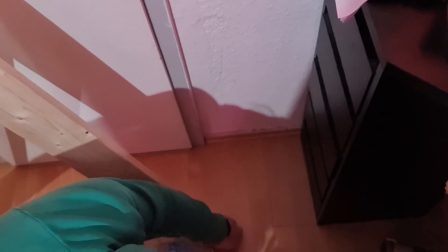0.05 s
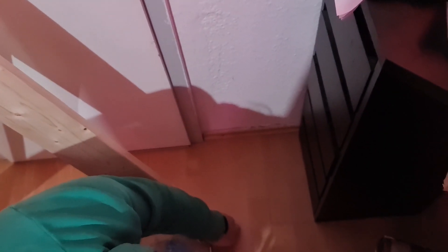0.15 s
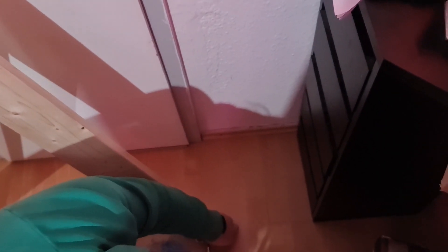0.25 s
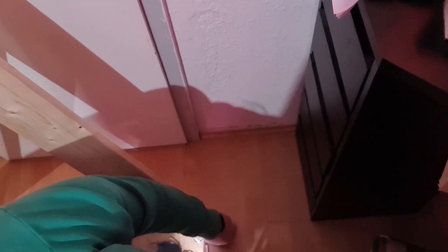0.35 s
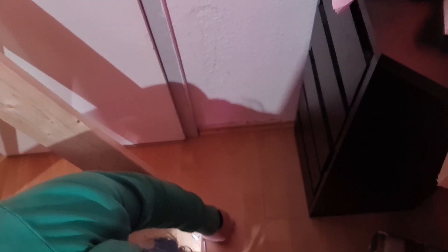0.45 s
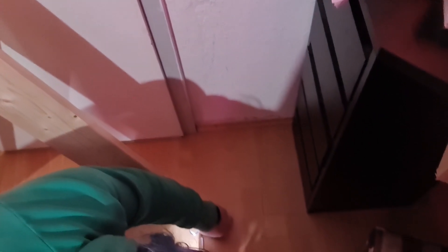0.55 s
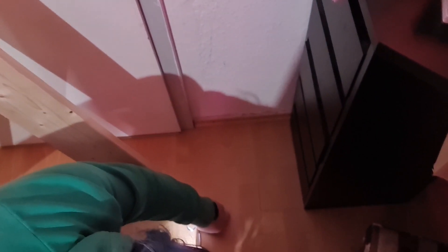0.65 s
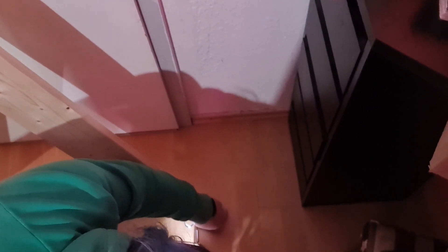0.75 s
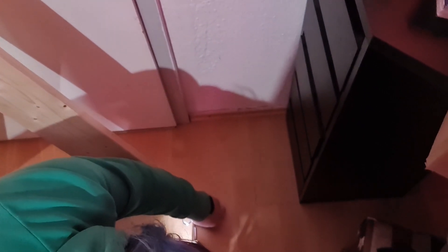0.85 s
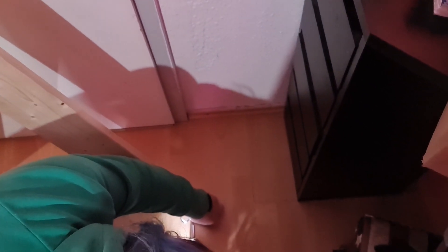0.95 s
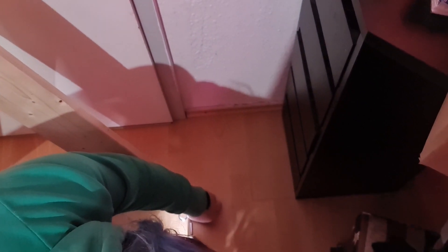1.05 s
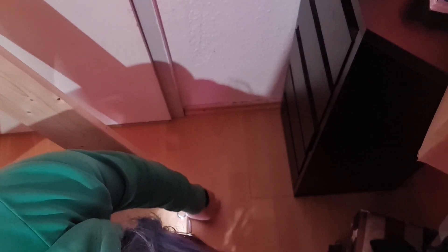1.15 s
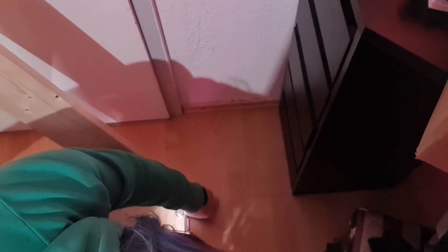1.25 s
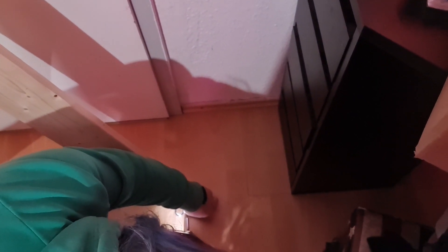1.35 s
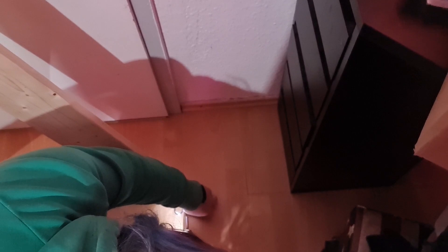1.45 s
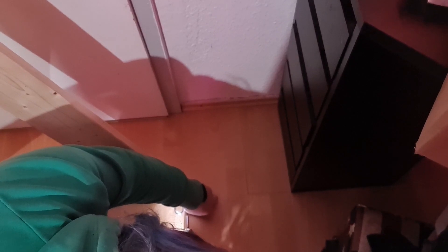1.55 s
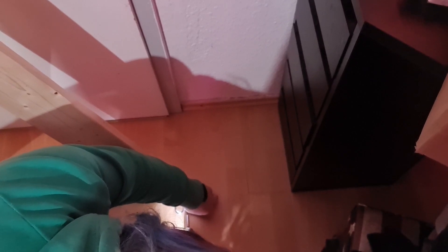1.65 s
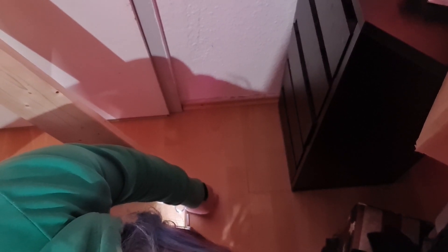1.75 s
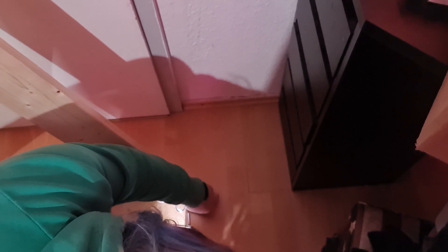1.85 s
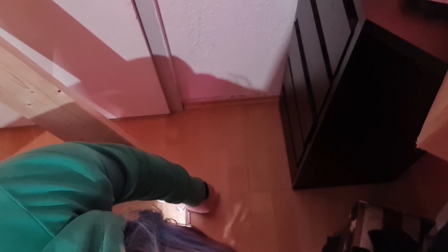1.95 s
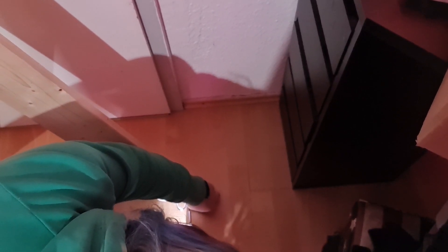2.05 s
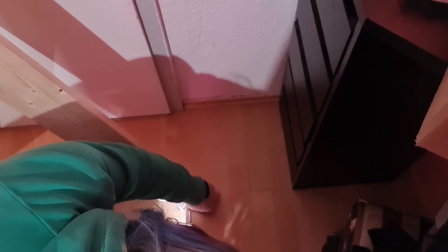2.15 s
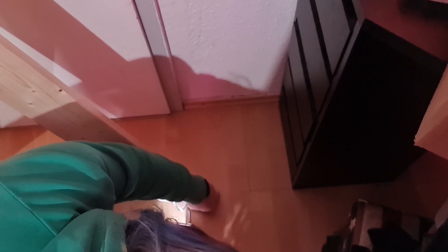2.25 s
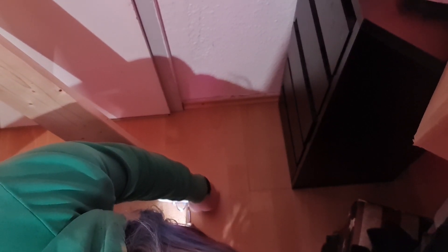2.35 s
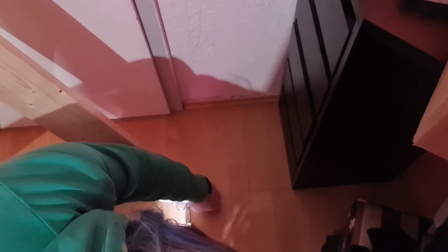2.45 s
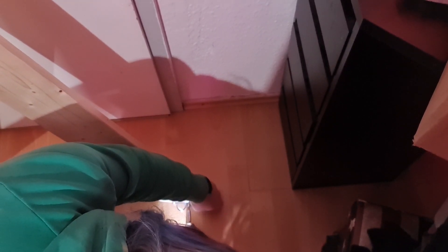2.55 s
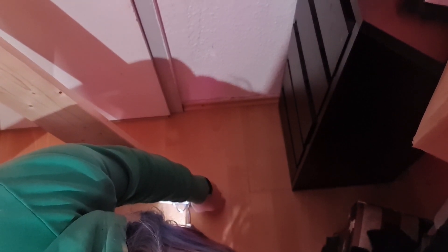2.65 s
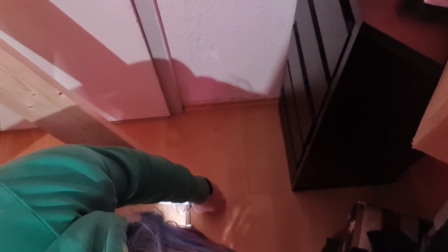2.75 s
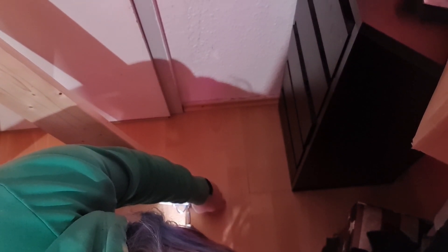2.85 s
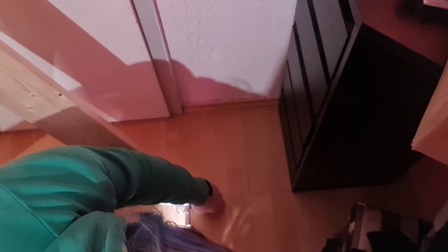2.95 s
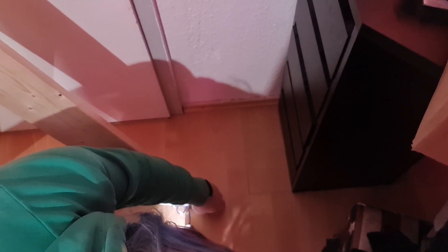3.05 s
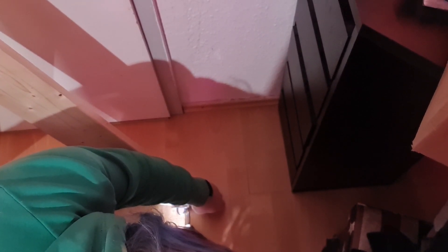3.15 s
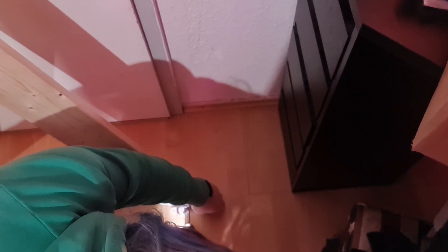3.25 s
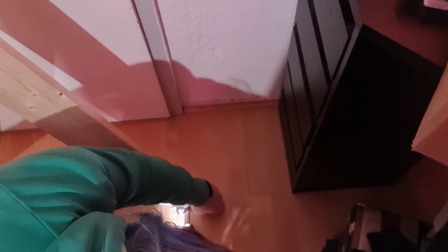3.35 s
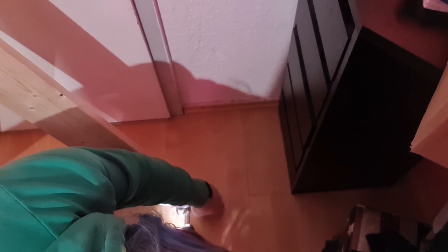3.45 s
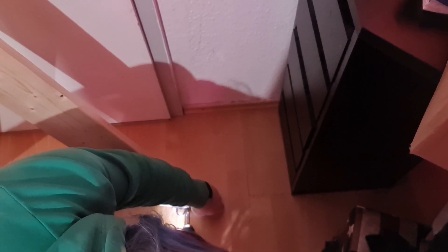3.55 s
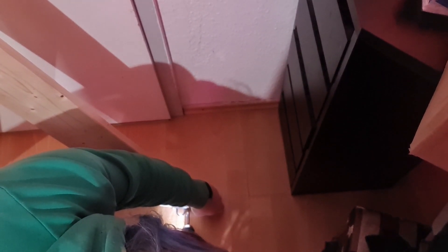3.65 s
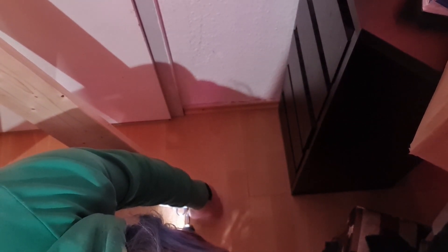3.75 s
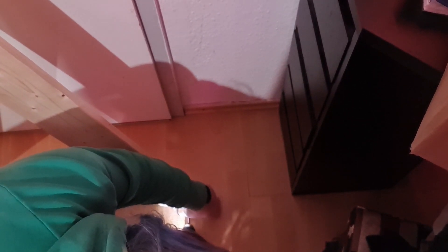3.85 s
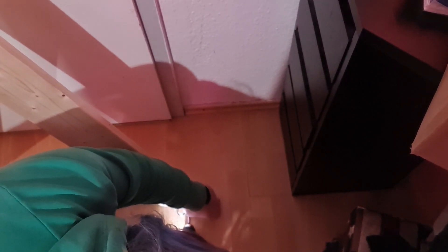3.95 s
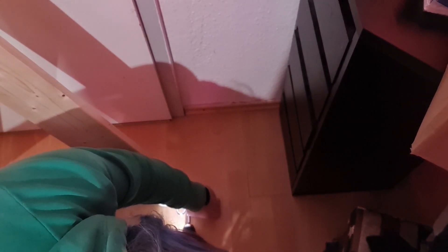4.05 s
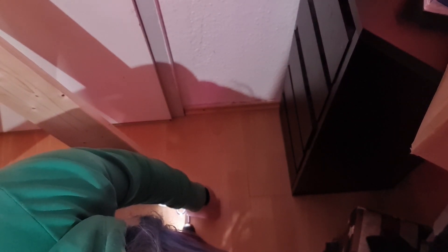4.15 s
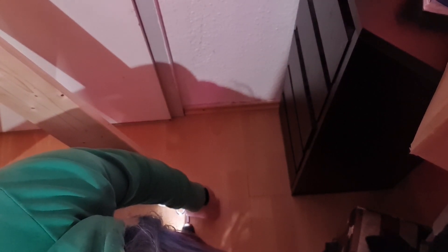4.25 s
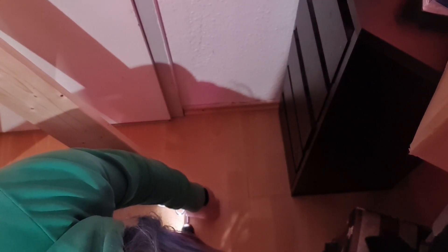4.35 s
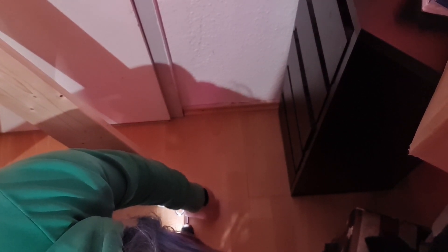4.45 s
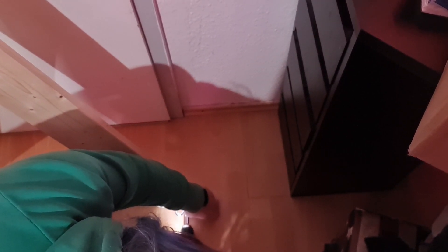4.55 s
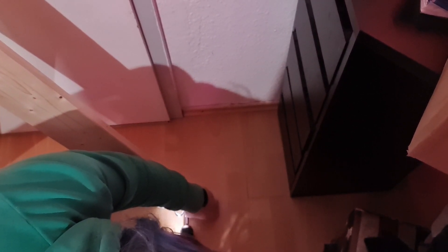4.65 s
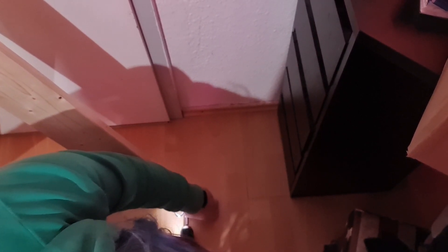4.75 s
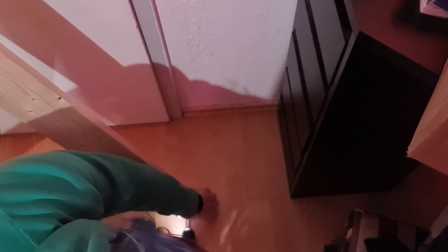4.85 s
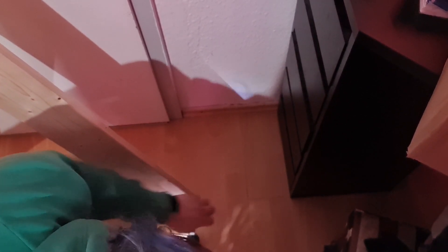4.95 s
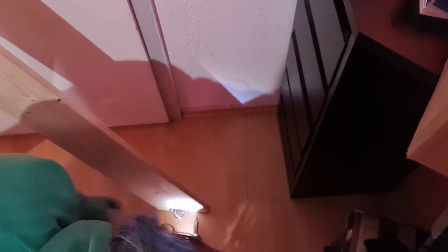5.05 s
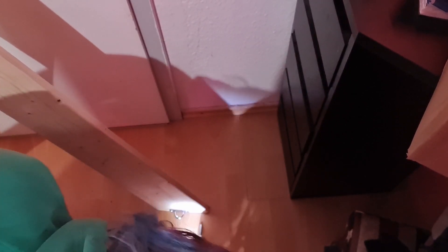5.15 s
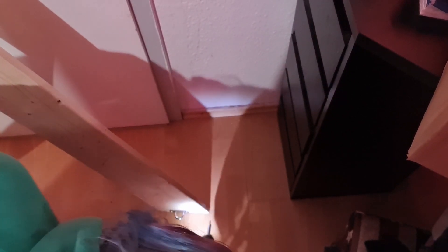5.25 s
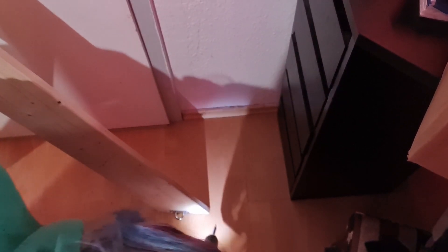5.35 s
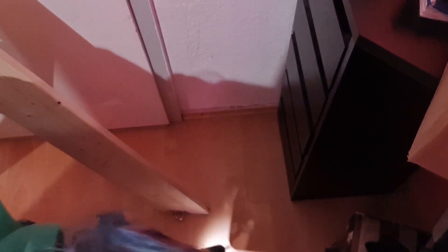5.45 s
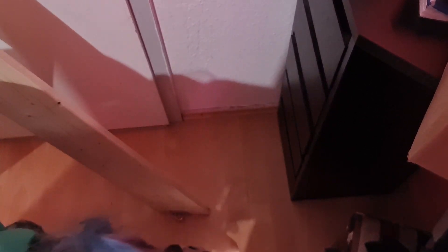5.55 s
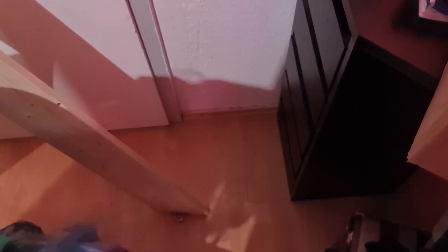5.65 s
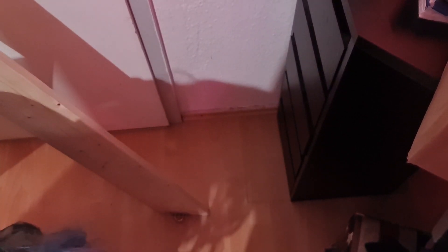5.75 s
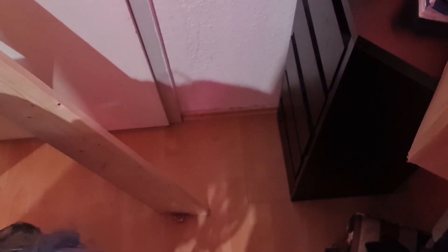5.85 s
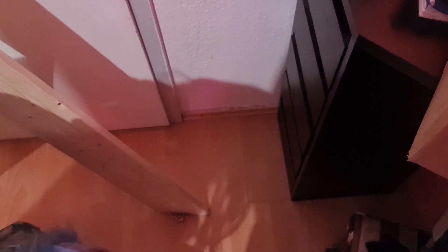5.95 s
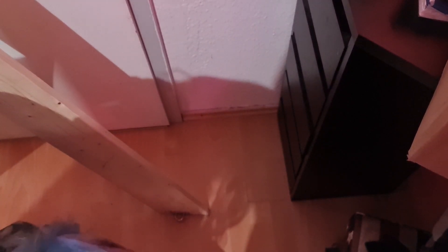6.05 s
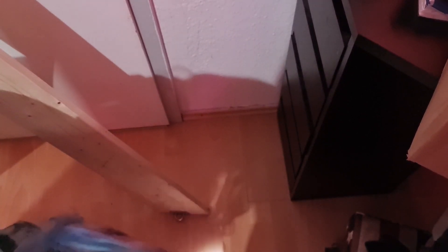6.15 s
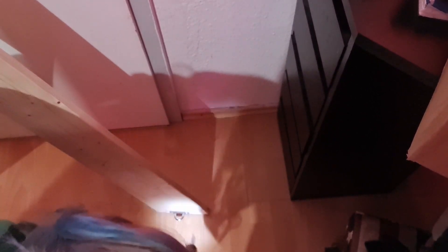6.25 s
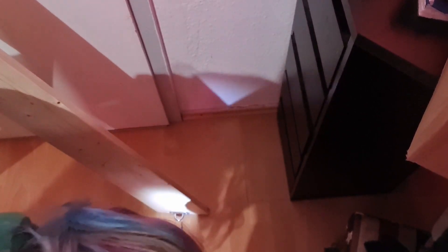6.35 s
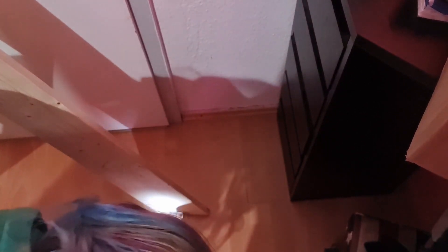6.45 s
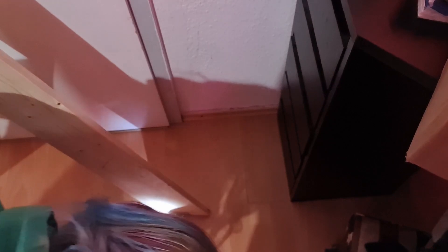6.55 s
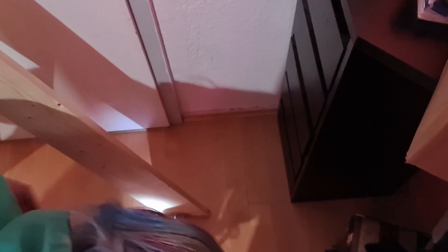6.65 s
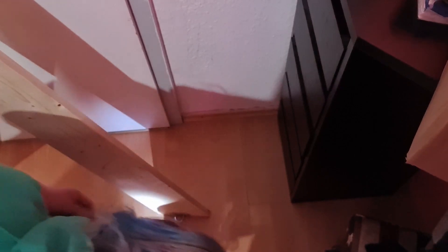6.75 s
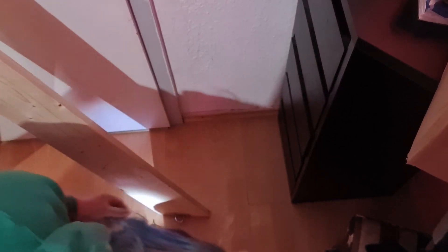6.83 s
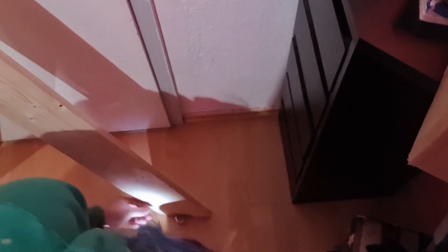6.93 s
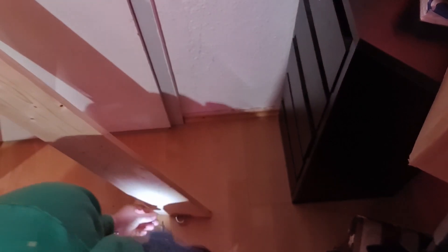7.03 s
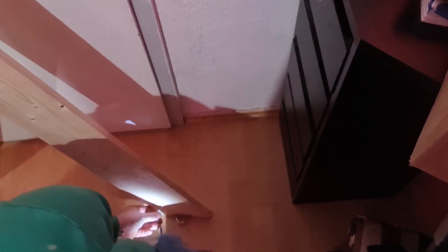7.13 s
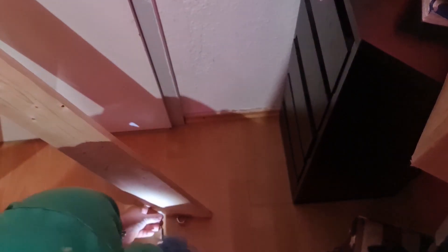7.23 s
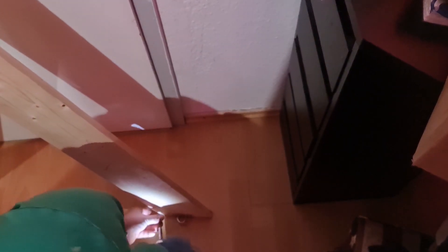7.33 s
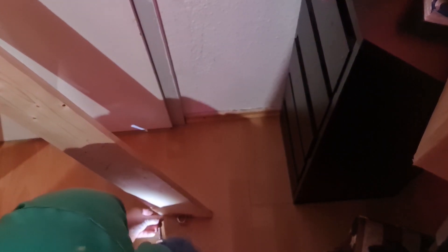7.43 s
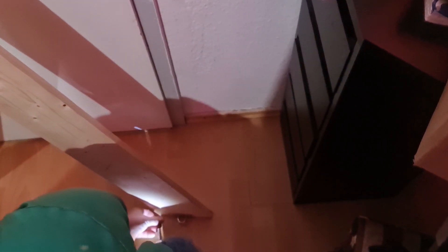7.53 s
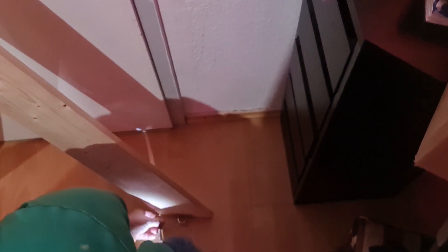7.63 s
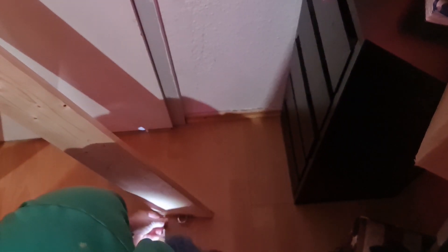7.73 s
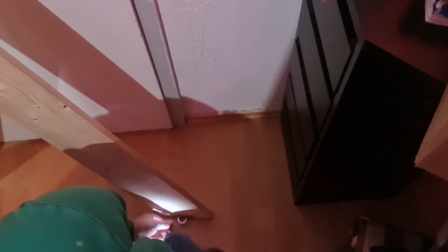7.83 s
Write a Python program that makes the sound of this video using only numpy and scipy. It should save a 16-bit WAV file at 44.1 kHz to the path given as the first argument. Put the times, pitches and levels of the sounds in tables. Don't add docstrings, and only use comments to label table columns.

```python
import sys
import numpy as np
from scipy import signal
from scipy.fft import rfft, irfft, next_fast_len
from scipy.io import wavfile
from scipy.ndimage import uniform_filter1d, map_coordinates

SR = 44100
rng = np.random.default_rng(int(sys.argv[2]) if len(sys.argv) > 2 else 0)


def amplitude_ratio(level_db):
    exponent = np.asarray(level_db, float) / 20
    return 10 ** exponent


def log_audio(samples):
    frames = np.atleast_2d(samples).T
    limited = np.clip(frames, -1, 1)
    pcm = np.round(limited * 32767).astype(np.int16)
    wavfile.write(sys.argv[1], SR, pcm)


N = 347949
TIME = np.arange(N) / SR

# (t/s,)
RUN_SPAN = [(.314,), (4.288,)]
# (t/s, extra rattle level/dB, extra gear whine level/dB, extra commutator level/dB)
BIT_LOAD = [(.33, -5, -23, -23), (.41, 1.5, 1.5, 1.5), (.62, 1.5, 1, 1), (.76, 2, 3, 2), (1.1, 0, 1, 1),
            (1.25, 0, -4, -2), (1.4, -.5, .5, 1), (1.62, -1, -5, -7), (1.72, 0, -4, 2), (1.82, 1, 2.5, -1),
            (2.1, 2, -7, -1), (2.25, 1, -5, -1), (2.4, .5, 1, -1), (2.55, 1, -3, -2), (2.75, 1.5, -4, -5),
            (2.9, 1.5, 1, -6), (3.15, 1, .5, -6), (3.42, 3, -2, -6), (3.55, 3.5, 5, -3), (3.62, 3, -18, -3),
            (3.68, 3.5, -12, -3), (3.73, 4, 1, -3), (3.8, 5.5, -4, -4), (3.97, 3, -8, -8), (4.03, 9, 0, -5),
            (4.1, 7.5, -5, 0), (4.2, 7, 1, -1), (4.28, 6, 0, -1)]
FULL_HZ = 320


def unit(x):
    return x / np.sqrt(np.mean(x ** 2) + 1e-20)


def along(points, hz):
    f, v = np.transpose(points)
    return np.interp(np.log(hz + 1), np.log(f + 1), v)


def curves(rows):
    s, *cols = np.transpose(rows)
    return [np.interp(TIME, s, c) for c in cols]


def during(rows, fade=0.01):
    inside_s = np.minimum(TIME - rows[0][0], rows[-1][0] - TIME)
    return np.clip(inside_s / fade + 1, 0, 1)


def wobble(rate):
    return map_coordinates(rng.standard_normal(int(N * rate / SR) + 4), [TIME * rate])


def swell(rows, rise):
    gain = 0
    for s, fade, db in rows:
        gain = gain + amplitude_ratio(db - 20 * np.maximum((s - TIME) / rise, TIME - s) / fade)
    return gain


def filtered(x, response):
    m = next_fast_len(N + SR // 2)
    return irfft(rfft(x, m) * response(np.fft.rfftfreq(m, 1 / SR)), m)[..., :N]


def resonances(peaks, hz):
    total = 0
    for k, (c, w, db) in enumerate(peaks):
        total = total + (-1) ** k * amplitude_ratio(db) * 1j * hz * w / (c * c - hz * hz + 1j * hz * w)
    return total


def rush(spectrum, grain_db, alike=None):
    # (f/Hz, correlation)
    usual_likeness = [(60, 0.8), (180, 0.62), (550, -0.252), (1650, -0.071), (4970, -0.186),
                      (15000, -0.026)]
    likeness = usual_likeness if alike is None else alike
    pair = rng.standard_normal((2, N)) * amplitude_ratio(grain_db * wobble(400))

    def mid_side(hz):
        turn = np.arccos(np.clip(along(likeness, hz), -1, 1)) / 2
        return amplitude_ratio(along(spectrum, hz)) * [np.cos(turn), np.sin(turn)]

    mid, side = filtered(pair, mid_side)
    return unit(np.array([mid + side, mid - side]))


def room(x, wet_db, lag=4):
    # (f/Hz, t60/s)
    decay = [(150, 0.362), (1000, 0.2484), (5000, 0.2353), (14000, 0.14)]
    hz, t, z = signal.stft(rng.standard_normal((2, SR // 2)), SR, nperseg=256)
    tail = signal.istft(z * amplitude_ratio(-60 * t / along(decay, hz)[:, None]), SR, nperseg=256)[1]
    tail = tail / np.linalg.norm(tail[0])
    wet = signal.fftconvolve(np.pad(x, (120, 0))[None], tail, axes=1)[:, :N]
    return np.array([x, np.roll(x, int(lag))]) + amplitude_ratio(wet_db) * wet


def add(track, s, sound):
    part = track[..., round(s * SR):][..., :sound.shape[-1]]
    part += sound[..., :part.shape[-1]]


def speed():
    # (t/s, speed aimed at f/Hz, lag/s, drift/(Hz/s))
    trigger = [(.304, 109.6, .063, 22), (.702, 182.1, .042, 13), (1.161, 350.3, .081, -85),
               (1.47, 319.5, .01, -413), (1.738, 275.6, .092, -118), (1.961, 242.6, .042, -354),
               (2.178, 248.4, .07, -1.4), (2.667, 323.7, .078, -9), (3.412, 217.6, .119, 66),
               (3.716, 245.3, .01, -423), (3.964, 150, .03, 150), (4.033, 212, .045, -6)]
    first_hz, finger_s = 30, .025
    hz = np.full(N, float(first_hz))
    for s, aim, lag, drift in trigger:
        k = round(s * SR)
        t = TIME[:N - k]
        hz[k:] = aim + drift * t + (hz[k] - aim) * np.exp(-t / lag)
    travel = round(finger_s * SR)
    return np.clip(uniform_filter1d(uniform_filter1d(hz, travel), travel), first_hz, None)


def whine():
    # (multiple of the shaft speed, level/dB)
    mesh_orders = [(12, 0), (11, -17), (36, -26)]
    brush_orders = [(5, 0), (4, -17), (10, -18)]
    shaft_orders = [(1, -1), (2, -9)]
    # (shaft f/Hz, level/dB)
    mesh_gain = [(100, -44), (142, -46.5), (185, -37.5), (210, -36), (245, -37), (280, -34.5), (300, -34.5),
                 (320, -26.5)]
    brush_gain = [(100, -54), (125, -54), (150, -42), (185, -34.5), (215, -33), (250, -34), (290, -36),
                  (320, -34)]
    unbalance_gain = [(115, -68), (145, -52), (200, -49), (250, -53.5), (285, -59), (320, -40.5)]
    # (f/Hz, width/Hz, level/dB)
    motor_can = (4760, 250, -35)
    # (shaft f/Hz, whistle level/dB)
    chopper = [(100, -58), (190, -53), (250, -50), (290, -62), (320, -69)]
    # (shaft f/Hz, level re the whistle/dB)
    upper_sideband = [(120, -1.5), (185, -9), (215, -3), (250, 2)]

    shaft_hz, running = speed(), during(RUN_SPAN)
    load_db, whine_db, spark_db = curves(BIT_LOAD)
    mesh_db = along(mesh_gain, shaft_hz) + whine_db + .6 * load_db
    brush_db = along(brush_gain, shaft_hz) + spark_db - 1.5 * (TIME - 1)
    shaft_db = along(unbalance_gain, shaft_hz) + .4 * whine_db
    angle = 2 * np.pi * np.cumsum(shaft_hz * (1 + .001 * wobble(60))) / SR
    flicker_db = np.clip((335 - shaft_hz) / 14, 1, 4.5) * np.clip(TIME - .2, .3, 1)

    def tone(orders):
        return sum(amplitude_ratio(db + 3 + flicker_db * wobble(24)) * np.sin(round(k) * angle) for k, db in orders)

    lines = amplitude_ratio(mesh_db) * tone(mesh_orders)
    unbalance = tone(shaft_orders[:1]) + (shaft_hz / FULL_HZ) ** 2 * 2.2 * tone(shaft_orders[1:])
    grip = (amplitude_ratio(brush_db) * tone(brush_orders) + amplitude_ratio(shaft_db) * unbalance) * running
    can_hz, can_width_hz, can_db = motor_can
    for order in range(15, 30, 5):
        lift = 1 / (1 + ((order * shaft_hz - can_hz) / can_width_hz) ** 2)
        lines += amplitude_ratio(can_db) * (shaft_hz / FULL_HZ) ** 5 * lift * np.sin(order * angle)
    chop = 2 * np.pi * 13050 * TIME
    whistle = .8 * np.sin(chop)
    whistle += amplitude_ratio(along(upper_sideband, shaft_hz)) * np.sin(chop + 5 * angle)
    whistle += np.minimum(115 / shaft_hz, 1) ** 3 * np.sin(chop - 5 * angle)
    nose = (lines + amplitude_ratio(along(chopper, shaft_hz)) * whistle) * running
    late = np.array([0 * grip, np.roll(grip, 4) - grip])
    return late + room(nose + grip, wet_db=-10, lag=0)


def gearbox():
    # (f/Hz, level per Hz/dB)
    housing = [(35, -55.5), (60, -28.5), (206, -27.5), (315, -13.5), (428, -18.5), (490, -10.5),
               (874, -10.5), (1240, 2.5), (1330, -0.5), (3000, -9.5), (3710, -7.5), (4240, -14.5),
               (6000, -19.5), (7800, -19), (13200, -120)]
    fan = [(1470, -13.5), (2500, -16), (2850, -16), (3130, -8.5), (5960, -5.5), (7930, -19), (13700, -16.5),
           (14600, -18.5), (15700, -27)]
    # (f/Hz, width/Hz, level/dB)
    shell = [(775, 120, -4), (1240, 70, 4)]
    beat_modes = [(641, 25, -12), (1240, 60, 0), (1890, 40, -7), (2270, 50, -8)]

    shaft_hz = speed()
    octaves = np.log2(np.maximum(shaft_hz, 108.5) / FULL_HZ)
    turn = np.sin(2 * np.pi * np.cumsum(shaft_hz) / SR)
    rattle = unit(filtered(rush(housing, grain_db=2.5), lambda hz: 1 + .6 * resonances(shell, hz)))
    carrier = 2 * np.pi * np.cumsum(shaft_hz / 19.5) / SR
    beat_db = -11 + 6 * np.sin(carrier + .8 * wobble(5))
    beat = unit(filtered(rush(housing, grain_db=1.5), lambda hz: resonances(beat_modes, hz)))
    rattle = rattle + amplitude_ratio(beat_db) * beat
    rattle = rattle + (amplitude_ratio(2.2 * (TIME - 2.2)) - 1) * filtered(rattle, lambda hz: hz < 750)
    hiss = rush(fan, grain_db=-0.5) * (1 + 0.41 * turn)
    load_db = curves(BIT_LOAD)[0]
    rattle_db = -22 + 11.5 * octaves + load_db
    hiss_db = -29 + 11 * octaves + 0.4 * load_db
    running = during(RUN_SPAN, fade=0.024) * amplitude_ratio(0.8 * wobble(14))
    return running * (amplitude_ratio(rattle_db) * rattle + amplitude_ratio(hiss_db) * hiss)


def clutch():
    # (t/s, peak level/dB, thud level re peak/dB)
    slip_hits = [(4.29, 1, -30), (4.294, -1, -50), (4.309, -8, -50), (4.317, -4, -50), (4.3215, 1, -30),
                 (4.327, -6, -50), (4.3435, 0, -27), (4.347, -3, -50), (4.352, -5, -50), (4.366, -5, -50),
                 (4.3695, 1, -29), (4.383, -9, -50), (4.392, 0, -29), (4.4, -6, -50), (4.409, -9, -50),
                 (4.417, 1, -31), (4.433, -8, -50), (4.444, 1, -30), (4.449, -3, -50), (4.6205, -1, -33),
                 (4.629, -6, -50), (4.657, -1, -28), (4.675, -9, -50), (4.6865, 1, -28), (4.691, -4, -50),
                 (4.707, -9, -50), (4.7213, -1, -30), (4.727, -6, -50)]
    # (f/Hz, level per Hz/dB)
    snap_tone = [(120, -39.5), (200, -6), (408, -2.5), (566, -8), (745, 0.5), (962, -3), (1150, 1),
                 (2440, -2.5), (3580, -5.5), (6090, -5.5), (7720, -14), (12900, -14.5), (15700, -13.5)]
    # (f/Hz, width/Hz, level/dB)
    snap_ring = [(760, 220, 5), (1140, 60, 1), (1600, 55, -3), (2330, 90, 0), (3620, 260, 3.5),
                 (5230, 230, -8), (6240, 120, -6)]

    cracks, thuds, t = np.zeros((2, N)), np.zeros(N), TIME[:SR // 5]
    snap_s, after_s, after_share = .004, .03, .175
    clatter = np.exp(-(t / snap_s) ** 2) + after_share * np.exp(-(t / after_s) ** 2)
    clatter = (1 - np.exp(-t / .0008)) * clatter
    for s, db, thud_db in slip_hits:
        grit = rng.standard_normal((2, len(t))) * amplitude_ratio(2.2 * rng.standard_normal(len(t)))
        add(cracks, s, amplitude_ratio(db - .3) * clatter * grit)
        detune = 1 + .12 * rng.standard_normal((2, 1))
        low, high = 2 * np.pi * t * np.array([[72], [150]]) * detune
        add(thuds, s, amplitude_ratio(db + thud_db - 60 * t / 0.085) * (np.sin(low) + 1.1 * np.sin(high)))
    body, edge = filtered(cracks, lambda hz: amplitude_ratio(along(snap_tone, hz)) * (1 + resonances(snap_ring, hz)))
    return .7 * room(body, wet_db=-2.5, lag=0) + .75 * edge * [[1], [-1]] + thuds


def jerks():
    # (t/s, peak level/dB, f/Hz, t60/s)
    releases = [(1.258, -47.5, 147.5, 0.17), (1.862, -31, 70.55, 0.297), (3.358, -22.5, 238.6, 0.15),
                (3.554, -24, 162.4, 0.285), (3.78, -26.5, 140.1, 0.36), (3.858, -25.5, 64.6, 0.18),
                (4.118, -24.5, 127, 0.437), (4.19, -29.5, 79.5, 0.157)]
    out, t = np.zeros(N), TIME[:SR // 4]
    woody = signal.butter(2, [130, 1100], "band", fs=SR)
    for s, db, hz, t60 in releases:
        creak = 4 * signal.lfilter(*woody, rng.standard_normal(len(t)))
        envelope = amplitude_ratio(db - 60 * t / t60) * (1 - np.exp(-t / 0.006))
        add(out, s, envelope * (np.sin(2 * np.pi * hz * t) + creak))
    return room(out, wet_db=-17.0)


def ticks():
    # (t/s, peak level/dB, low edge f/Hz, high
    # edge f/Hz, t60/s)
    contacts = [(.214, -33, 1300, 5500, 0.053), (.215, -44, 5000, 15500, .02), (.31, -34.5, 400, 2500, .08),
                (.345, -33, 500, 2500, 0.063), (3.146, -17, 1000, 4024, 0.068),
                (3.166, -7, 1000, 3000, 0.075), (4.033, -16, 800, 3880, 0.13), (4.603, -25, 300, 4000, .3),
                (4.609, -19, 400, 1500, .3), (4.614, -24, 1500, 4000, .2), (5.121, -30.5, 204, 1490, .06),
                (5.441, -46, 800, 4970, 0.1023), (5.572, -42.5, 4500, 6800, 0.078),
                (5.658, -41, 497, 4000, 0.067), (6.069, -50, 503, 3000, 0.042),
                (6.264, -31.5, 600, 2500, 0.066), (6.392, -34, 400, 860, 0.0456),
                (6.396, -40, 1490, 4044, 0.057), (6.832, -44.5, 1500, 5770, 0.0355),
                (7.287, -45.5, 150.2, 1210, 0.0297), (7.368, -50.5, 200, 1200, 0.026),
                (7.605, -53, 3000, 5930, 0.12), (7.747, -50, 3000, 7500, .2)]
    out, t = np.zeros((2, N)), TIME[:SR // 5]
    for s, db, low_hz, high_hz, t60 in contacts:
        band = signal.butter(3, [low_hz, high_hz], "band", fs=SR)
        ring = unit(signal.lfilter(*band, rng.standard_normal((2, len(t)))))
        add(out, s, amplitude_ratio(db - 7) * ring * (amplitude_ratio(-60 * t / t60) + 0.2 * amplitude_ratio(-60 * t / 0.33)))
    return out


def knocks():
    # (t/s, peak level/dB, bounce after/s, bounce level/dB)
    bumps = [
        (5.1325, -16.5, .009, -6),
        (5.517, -18, .008, -8),
        (5.7945, -11, .008, -4),
    ]
    # (f/Hz, level/dB, t60/s)
    board = [
        [(170, -8, 0.1473), (246.4, -6, 0.115), (329.4, -1, 0.104), (528.5, -2.5, 0.073), (634, -6.5, 0.098),
         (1199.4, -12.5, 0.101), (1565, -11, 0.076), (1718, -7, 0.064), (2240, -7, 0.075), (2500, -1, 0.0485),
         (3535, -9.5, 0.068)],
        [(68.9, -9.5, 0.16), (176, 4, 0.21), (153.06, 1, 0.267), (278, -8.5, 0.14), (400, -5, 0.084),
         (686.5, 3.5, 0.037), (760, 1.5, 0.04), (1714, -0.5, 0.0736), (1906, -8, 0.068), (3000, -19, 0.12),
         (3430, -17.5, 0.142)],
        [(59.7, -8, 0.14), (154.8, -13, 0.176), (744, -4.5, 0.046), (1000, -18.5, 0.134), (1130, -8.5, 0.085),
         (1443, -13, 0.065), (2030, -14.5, 0.079), (2320, -10, 0.058), (3025, -16, 0.122), (5150, -18, 0.16)],
    ]
    out, t = np.zeros(N), TIME[:SR // 2]
    dull = signal.butter(3, [250, 5000], "band", fs=SR)
    for (s, db, bounce_s, bounce_db), modes in zip(bumps, board):
        ring = np.zeros(len(t))
        for hz, level, t60 in modes:
            build = 1 - np.exp(-t * hz / 0.68)
            ring += amplitude_ratio(level - 60 * t / t60) * build * np.sin(2 * np.pi * hz * t)
        crack = signal.lfilter(*dull, rng.standard_normal(len(t))) * amplitude_ratio(-60 * t / 0.031)
        add(out, s, amplitude_ratio(db - 9) * (ring + 1.15 * crack))
        add(out, s + bounce_s, amplitude_ratio(db - 9 + bounce_db) * (ring + 1.5 * crack))
    return room(out, wet_db=-7.5)


def hands():
    # (peak t/s, fade per 20 dB/s, cloth or finger scrape level/dB, board shuffle level/dB)
    hand_moves = np.array([(4.9, 0.32, -58, -66), (5.14, 0.19, -52.5, -54), (5.25, 0.43, -65, -61),
                           (5.45, 0.29, -58, -65.5), (5.54, 0.23, -56, -58), (5.66, 0.1566, -60, -67),
                           (5.8, .1, -42.5, -58), (5.87, 0.2645, -58.5, -65.5), (6.07, 0.4, -59, -66),
                           (6.4, 0.84, -67.5, -69.5), (6.75, 0.34, -61, -63), (6.96, 0.11, -57.5, -64.5),
                           (7.17, 0.2, -68, -69), (7.374, .06, -43, -66), (7.398, .1, -47, -70),
                           (7.6, 0.11, -59, -76.5), (7.764, .1, -45, -62.5), (7.787, .16, -47, -70),
                           (6.925, 0.02, -64, -70)])
    # (peak t/s, fade per 20 dB/s, level/dB)
    sleeve_slips = [(5.5, .15, -60), (5.58, .1, -63), (5.675, .12, -40), (5.8, .11, -47), (5.97, .1, -46),
                    (6.07, .08, -47), (6.16, .03, -55), (6.25, .14, -58), (6.36, .15, -63),
                    (6.45, .08, -66), (6.85, .15, -62), (6.96, .05, -68)]
    # (t/s,)
    search_span = [(6.7,), (7.9,)]
    # (t/s, level/dB)
    bit_settles = [(0.0, -37), (0.058, -40.5), (0.176, -67.5), (0.222, -48.5), (0.238, -52), (0.3, -66.5)]
    # (f/Hz, level per Hz/dB)
    sleeve_tone = [(9000, -40), (11000, -30), (12600, -21), (13150, -6), (13550, 0), (13900, -6),
                   (14400, -20), (15000, -28), (15800, -34)]
    scrape_tone = [(900, -40), (1600, -20), (2200, -15), (2600, -5), (3000, -9), (3600, -6), (3950, 2),
                   (4400, -7), (6000, -8), (7200, -13), (7800, -27), (12000, -40)]
    rustle_tone = [(900, -35), (1500, -6), (2400, -4), (4100, -4), (7100, -8), (7700, -22), (12000, -28),
                   (16000, -40)]
    shuffle_tone = [(90, -30), (160, -6), (400, -3), (720, -3), (1500, -8), (3000, -15), (7000, -26),
                    (7600, -120)]
    settle_tone = [(88, -27.5), (150, -4), (411, -11.5), (1350, -5), (1480, -12), (1850, -10.5),
                   (2030, -10.5), (12000, -42), (15600, -68.5), (22000, -120)]

    move_rise, slip_rise = 0.098, .3
    uneven = amplitude_ratio(3.5 * wobble(60) - 1.5)
    rub = swell(sleeve_slips, slip_rise) * uneven * rush(sleeve_tone, grain_db=1.5)
    picking = during(search_span, fade=0.099)
    scrape = picking * rush(scrape_tone, grain_db=1.5) + (1 - picking) * rush(rustle_tone, grain_db=1.5)
    pushes = swell(hand_moves[:, [0, 1, 3]], move_rise) + amplitude_ratio(-71)
    stir = swell(hand_moves[:, :3], move_rise) * scrape + pushes * rush(shuffle_tone, grain_db=2.0)
    settle_gain = during(bit_settles) * amplitude_ratio(curves(bit_settles)[0] - 0.5)
    settle = settle_gain * rush(settle_tone, grain_db=0.0)
    return amplitude_ratio(3.0) * stir + rub + settle


def squeaks():
    # (t/s, f/Hz, level/dB)
    glides = [
        [(5.23, 12000, -90), (5.28, 13300, -80), (5.31, 14040, -74), (5.37, 14300, -77), (5.43, 13200, -86)],
        [(7.04, 11850, -86), (7.074, 11840, -76), (7.156, 11920, -77), (7.208, 12570, -72), (7.27, 13250, -76),
         (7.3, 13250, -82), (7.33, 12300, -86)],
    ]
    out = np.zeros(N)
    for rows in glides:
        hz, db = curves(rows)
        gain = during(rows) * amplitude_ratio(db + 2.5 + 4.0 * wobble(70))
        out += gain * np.sin(2 * np.pi * np.cumsum(hz + 60 * wobble(90)) / SR)
    return room(out, wet_db=-6.0)


def air_and_rumble():
    # (f/Hz, level per Hz/dB)
    air_tone = [(65, -39.5), (110, -10), (160, -18), (214, -5), (544, -6.5), (877, -15.5), (1150, -6),
                (8440, -32), (12300, -23), (15700, -30)]
    rumble_tone = [(12, -45.5), (20, -15.5), (38, -6), (70, 0.5), (86, -1.5), (105, -9), (140, -37),
                   (230, -120)]
    # (peak t/s, fade per 20 dB/s, level/dB)
    body_jolts = [(0, 0.22, -46.5), (1.35, 0.05, -56.5), (1.9, 0.04, -45.5), (3.4, .08, -44),
                  (3.6, 0.14, -42), (3.84, 0.22, -36), (4.2, 0.17, -39), (4.4, 0.2521, -29.5),
                  (4.7, 0.0929, -30), (5.05, 1.04, -59), (5.53, 0.065, -41), (5.82, 0.0675, -37),
                  (6.3, 0.93, -70)]
    drill_shake = amplitude_ratio(-56) * speed() / FULL_HZ * during(RUN_SPAN, fade=.1)
    shake = swell(body_jolts, rise=.6) + drill_shake + amplitude_ratio(-69)
    rumble = shake * rush(rumble_tone, grain_db=1, alike=[(50, 0.834)])
    return amplitude_ratio(-63) * rush(air_tone, grain_db=-0.5) + rumble


def scene():
    # (f/Hz, left minus right level/dB)
    lean = [(60, -3.5), (180, 0.5), (550, -0.5), (1650, -2.5), (4970, -1), (15000, -0.5)]
    drill = whine() + gearbox() + clutch() + jerks() + ticks()
    dry = drill + knocks() + hands() + squeaks() + air_and_rumble()
    return filtered(dry, lambda hz: amplitude_ratio(along(lean, hz) * np.array([[.5], [-.5]])))


def top_cut(x):
    return signal.sosfilt(signal.butter(12, 15880, fs=SR, output="sos"), x)


def record(dry):
    limited = 1.1 * dry / (1 + np.abs(dry) ** 6) ** (1 / 6)
    return top_cut(limited)


dry = scene()
out = record(dry)
log_audio(out)
```